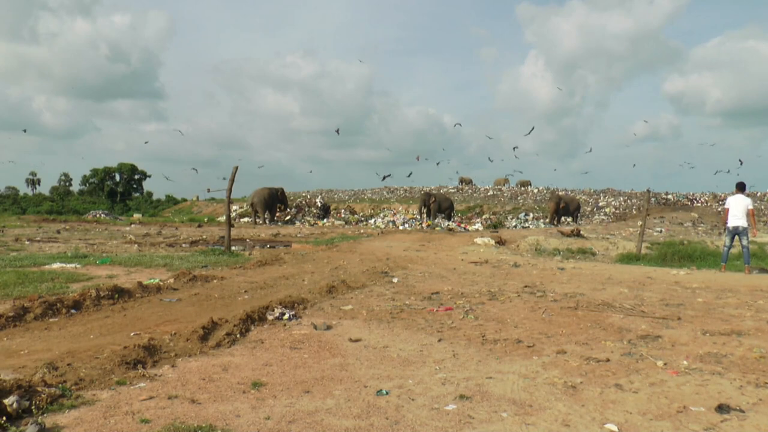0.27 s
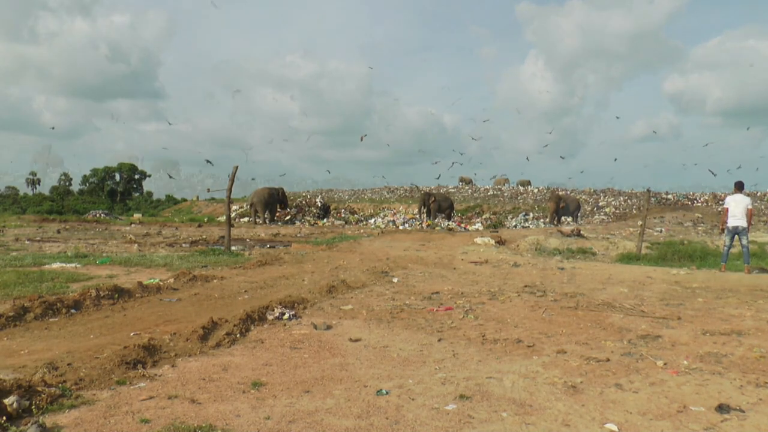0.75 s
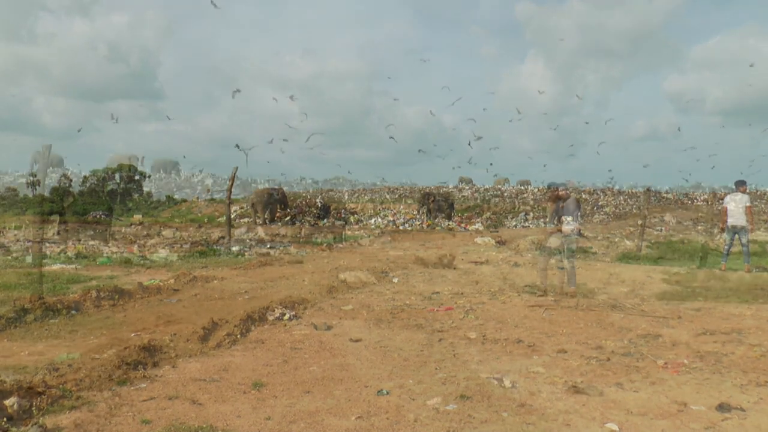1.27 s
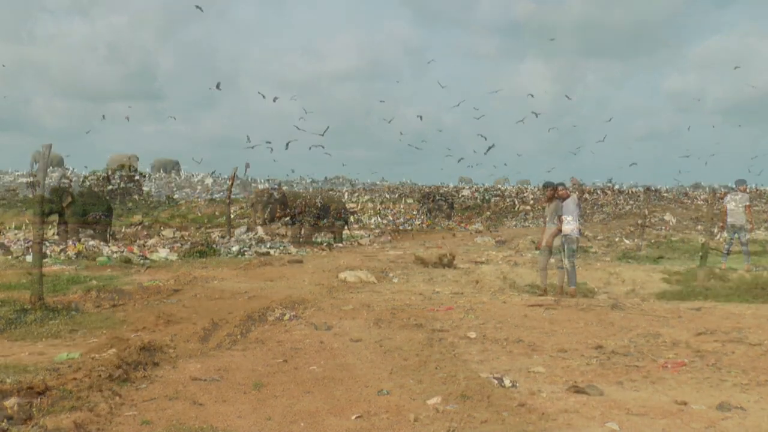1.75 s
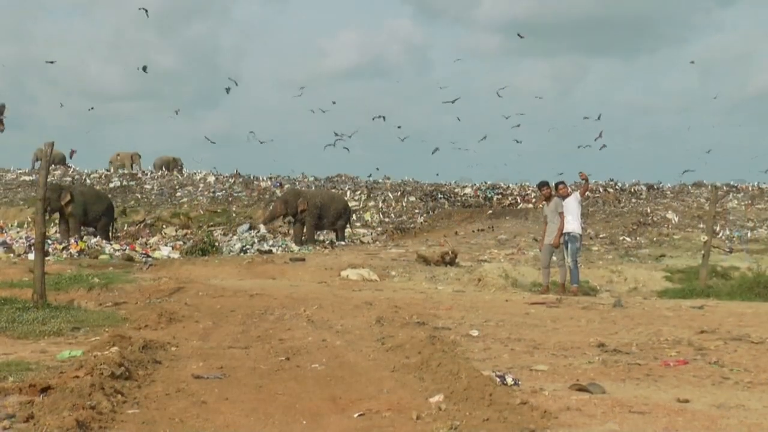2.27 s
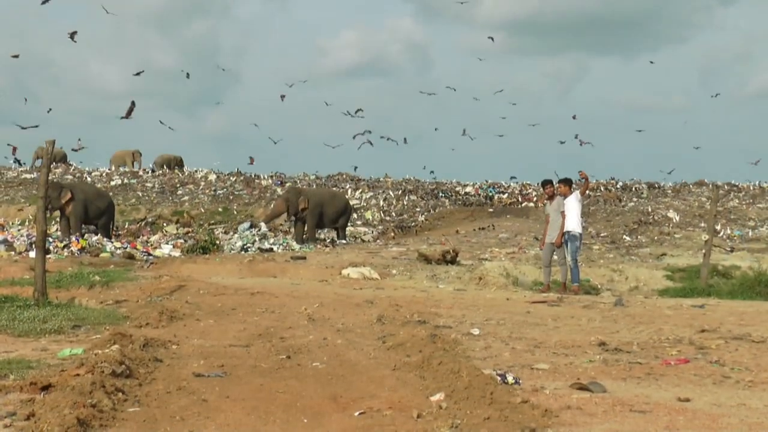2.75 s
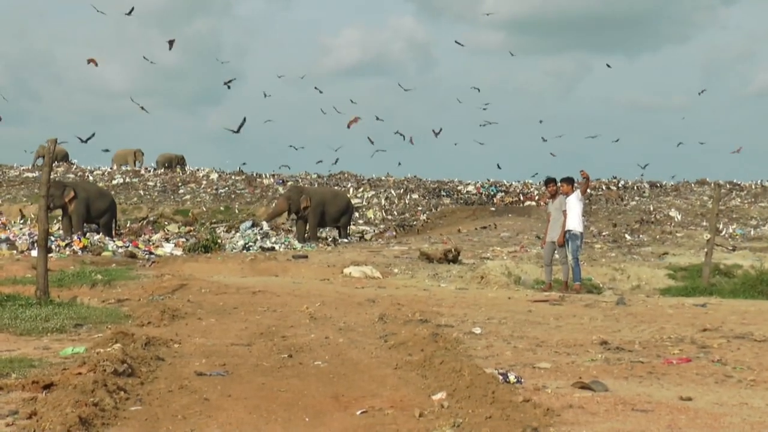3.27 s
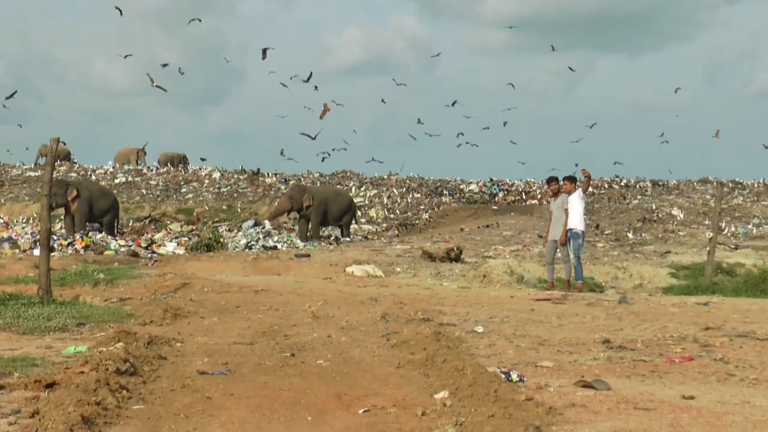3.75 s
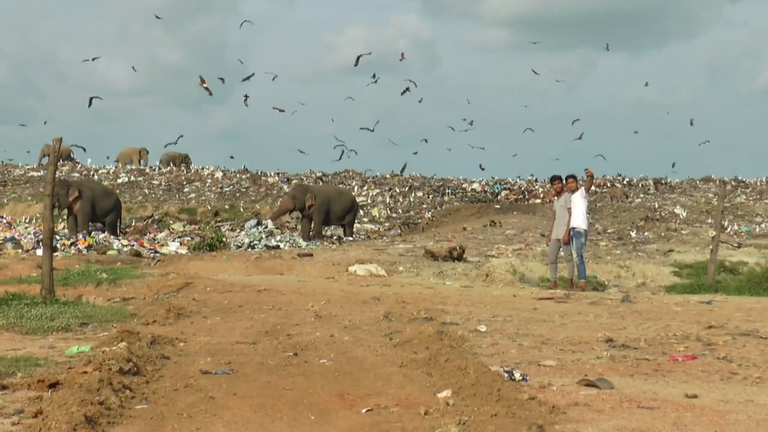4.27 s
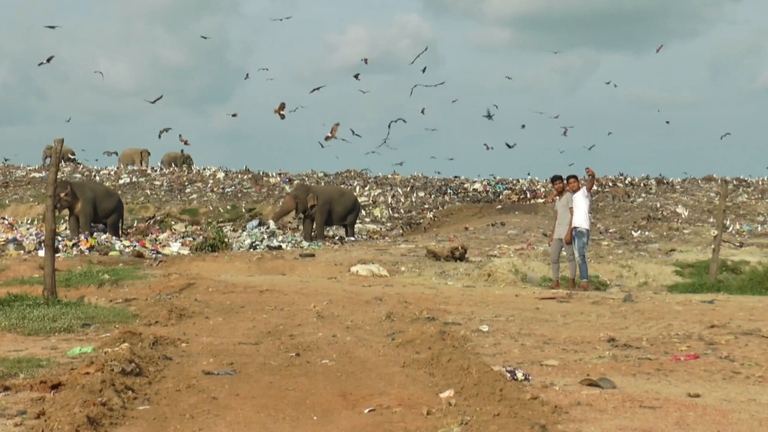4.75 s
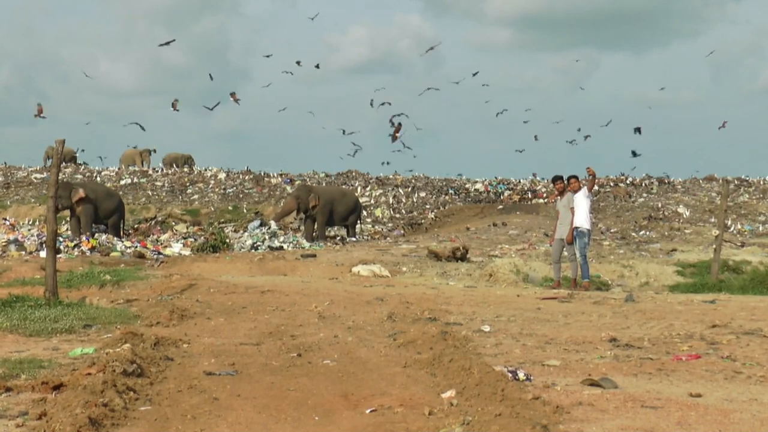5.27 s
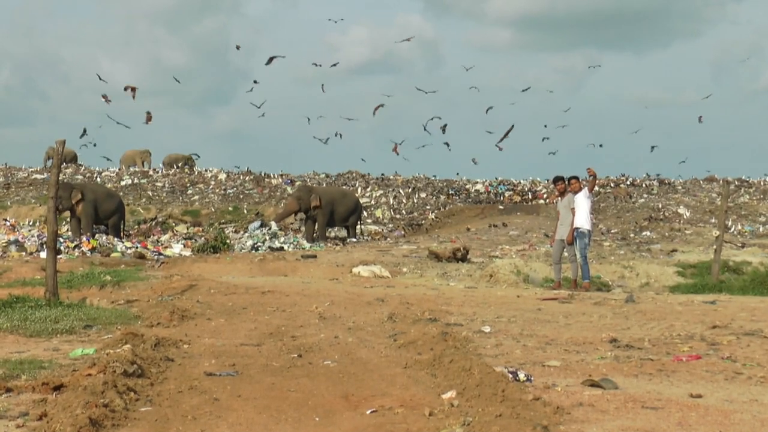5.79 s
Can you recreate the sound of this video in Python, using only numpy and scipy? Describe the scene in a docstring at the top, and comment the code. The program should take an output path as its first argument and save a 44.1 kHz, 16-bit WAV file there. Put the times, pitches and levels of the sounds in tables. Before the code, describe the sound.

Many crows caw in an overlapping din over open ground, with small birds chirping thinly and wind buffeting the microphone at first.

```python
"""Crows caw over open ground: near birds, a voice stacked of partials, rattled by the syrinx, with rasp on top.
A far flock of many such caws blurs into a din. Bending tones are high chirps of small birds and, below 2 kHz,
probably wails of crows; small birds also trill, peep and buzz thinly, and a few dry ticks are bursts of noise.
Ground and heaps echo the birds. Wind, lumpy low noise and hiss, buffets both microphone ports, most at first;
a faint low hum lies beneath. Near the end the sound drops out for a moment."""
import sys
import numpy as np
from scipy import signal
from scipy.fft import rfft, irfft, next_fast_len
from scipy.io import wavfile
from scipy.ndimage import uniform_filter1d, map_coordinates

SR = 44100
rng = np.random.default_rng(int(sys.argv[2]) if len(sys.argv) > 2 else 0)


def to_wav(s):
    """Save 16-bit WAV."""
    ch = np.atleast_2d(s).T  # columns
    pcm = np.round(np.clip(ch, -1, 1) * 32767)  # PCM
    wavfile.write(sys.argv[1], SR, pcm.astype(np.int16))


N = 265482  # samples, about 6 s


def amp(db):
    """Gain of a level in dB."""
    return 10 ** (np.asarray(db) / 20)


def unit(x):
    """x at rms 1."""
    return x / np.sqrt(np.mean(x ** 2) + 1e-20)


def along(points, hz):
    """Values at hz between (f/Hz, value) points, on a log frequency axis."""
    f, v = np.transpose(points)
    return np.interp(np.log(hz + 1), np.log(f + 1), v)


def curves(rows, fade=0.005):
    """Columns sample by sample over the span of the rows, and an edge with a start and end of fade seconds."""
    s, *cols = np.transpose(rows)
    t = np.arange(s[0], s[-1], 1 / SR)
    edge = np.clip(np.minimum(t - s[0], s[-1] - t) / fade, 0, 1)
    return [np.interp(t, s, c) for c in cols] + [edge]


def whole(rows):
    """Columns for every sample of the scene."""
    s, *cols = np.transpose(rows)
    return [np.interp(np.arange(N) / SR, s, c) for c in cols]


def wobble(rate, size):
    """A smooth random curve through rate random knots a second."""
    knots = rng.standard_normal(int(size * rate / SR) + 4)
    return map_coordinates(knots, [np.arange(size) * rate / SR])


def coloured(x, points):
    """x through a spectrum of (f/Hz, level/dB) points."""
    size = x.shape[-1]
    padded = next_fast_len(size + 2048)
    gain = amp(along(points, np.fft.rfftfreq(padded, 1 / SR)))
    return irfft(rfft(x, padded) * gain, padded)[..., :size]


def turning(hz):
    """A unit pointer that turns at hz from a random phase; its real part is a pure tone."""
    return np.exp(2j * np.pi * (np.cumsum(hz) / SR + rng.random()))


def add(stage, s, sound, pan_db, lag=3):
    """Places a sound left over right by pan_db; the right port hears it lag samples late."""
    for channel, start in enumerate((round(s * SR), round(s * SR) + lag)):
        heard = sound[max(-start, 0):]
        room = stage[channel, max(start, 0):][:len(heard)]
        room += amp(-pan_db * channel) * heard[:len(room)]


# Resonance of a crow's throat, for its upper partials and rasp: f/Hz, relative level/dB
THROAT_SPECTRUM = [(300, -50), (700, -26), (1100, -6), (1700, 0), (2300, -8), (3000, -26), (5000, -60),
                   (20000, -120)]
# Treble part of the rasp: f/Hz, relative level/dB
BEAK_SPECTRUM = [(1500, -60), (2600, -14), (3700, -14), (4000, 0), (4250, 0), (4600, -16), (5500, -10),
                 (6300, -3), (7200, -7), (8500, -13), (10000, -17), (14000, -40)]


def caw(voice, colour, rows):
    """A stack of partials, chopped by a slower second vibration of the syrinx, with rasp gated by it."""
    share, strongest, spread, rasp_db = voice
    first_db, second_db, fourth_db, treble_db = colour[:4]
    pitch, level_db, edge = curves(rows)
    size = len(pitch)
    pitch = uniform_filter1d(pitch, size=800, mode="nearest")
    tone = turning(pitch * (1 + .003 * wobble(60, size)))
    rattle = turning(share * pitch * (1 + .03 * wobble(30, size)))

    # The slow vibration puts sidebands around every partial; the fundamental is hardly chopped.
    chop = 0
    for j in range(-3, 4):
        sideband = np.exp(-((j - strongest) / spread) ** 2 / 2 + 1.2j * j * j)
        chop = chop + sideband * rattle ** j

    # The fifth and sixth partials follow the fourth through the throat.
    throat_db = along(THROAT_SPECTRUM, pitch.mean() * np.arange(4, 7))
    gains = amp([second_db, 0, *(fourth_db + throat_db - throat_db[0])])
    stack = 0
    for partial, gain in enumerate(gains, start=2):
        stack = stack + gain * amp(1.18 * wobble(38.36, size)) * tone ** partial
    fundamental = amp(first_db) * tone * (1 + 0.21 * chop)
    voiced = (stack * chop + fundamental).real

    gate = (1 + .7 * rattle.real) * (1 + .5 * tone.real)
    breath = gate * rng.standard_normal(size)
    rasp = amp(rasp_db) * unit(coloured(breath, THROAT_SPECTRUM))
    rasp += amp(treble_db) * unit(coloured(breath, BEAK_SPECTRUM))
    return np.sqrt(2) * edge * amp(level_db) * (voiced + np.std(voiced) * rasp)


# A near caw climbs to its top from this share of it, swelling; then it sags.
RISE_S, RISE_FROM, ATTACK_DB = .055, .9, -10
RELEASE_DB, RELEASE_LATE = -10, 7.3  # the breath gives out at the very end: loss, and its power of time
# Rattle as share of pitch, and strongest sideband; deep voices rattle at a larger share.
RATTLE, DEEP_RATTLE, DEEP_HZ = (.155, .15), (.22, -1.6), 500
RASP_DB, RASP_DB_PER_HOARSE = -24.5, 10  # a hoarser bird rasps more
# Near caws: top reached t/s, sag length t/s, top f/Hz, end f/Hz, lateness of the sag [power of time],
# third partial level/dB at top and at end (before the release), hoarseness [sideband spread],
# partials 1, 2 and 4 level/dB against the third, treble rasp level/dB against the voiced sound,
# pan level/dB left over right
NEAR_CAWS = [ (0, 0.18, 569.3, 476.6, 0.91, -51, -63, 0.34, -20.5, -17, -14, -22, -4),
             (.02, 0.25, 683.5, 606, 1.23, -68.5, -52.5, 1.26, -26, -16, -18, -34, -3),
             (.52, 0.051, 592, 573, 1.3, -59.5, -53, 0.66, -29, -10, -30, -21, -3),
             (.81, 0.17, 648, 612, 1.43, -53.5, -57, 0.56, -31, -9, -38, -32, 4.5),
             (1.005, .405, 596, 470, 1.35, -48.5, -52.5, 0.86, -22, -14.5, -19.5, -19, -5),
             (1, 0.23, 430.5, 399.4, 1.5, -56, -59.5, 0.55, -25, -20, 4, -33, -3.5),
             (1.765, 0.31, 633.6, 513.5, 1.48, -44.5, -55.5, 0.51, -25.5, -9, -26.5, -33, -5),
             (1.89, 0.2, 548, 500, 1.41, -57.5, -58, 1.62, -20, -11.5, -8, -25, -2),
             (2.19, 0.27, 590, 483, 1.12, -51.5, -57.5, 0.74, -30, -13.5, -37, -44, -1),
             (2.42, 0.34, 635, 566, 1.1, -59.5, -62, 1.4, -18.5, -19, -19, -29, 6),
             (2.945, 0.27, 664.6, 531, 2.18, -63.5, -60.5, 1.37, -11, -5.5, -7.5, -19, -3),
             (3.35, 0.2, 437.8, 398, 1.8, -61, -62.5, 0.71, -41, -38, 9.5, -10, -4),
             (3.63, 0.3, 668, 545.5, 1.6, -58, -51.5, 1, -22, -8.5, -18, -26, -5.5),
             (4.05, 0.18, 614, 491, 1.2, -61, -53, 0.98, -27, -19, -23, -16, 2),
             (4.175, .35, 641, 481.7, 1.28, -59.5, -61.5, 0.83, -18.5, -9.5, -17, -35, -5),
             (4.779, 0.26, 666.6, 559.3, 1.2, -47.5, -49.5, 0.67, -22.5, -13.5, -19.5, -34, -4.5),
             (5.06, 0.31, 589, 486.5, 1.4, -43, -61, 0.66, -22, -11.5, -20, -26.5, -4.5),
             (5, 0.48, 690, 566, 1.16, -62, -55, 0.82, -19.5, -13, -24, -15.5, -7),
             (5.84, 0.18, 580.5, 520, 1.6, -60, -55.5, 1.2, -40, -13, -13, -24, 0), ]


def crows():
    """Near caws: each climbs quickly to its top pitch, then sags until the breath gives out."""
    stage, u = np.zeros((2, N)), np.linspace(0, 1, num=12)
    for s, long, top, end, late, db, end_db, hoarse, *colour in NEAR_CAWS:
        sag_hz = top - (top - end) * u ** late
        sag_db = db + (end_db - db) * u + RELEASE_DB * u ** RELEASE_LATE
        rows = [
            (s - RISE_S, RISE_FROM * top, db + ATTACK_DB),
            (s - RISE_S / 2, (RISE_FROM + 3) / 4 * top, db + ATTACK_DB / 2),
            *zip(s + long * u, sag_hz, sag_db),
        ]
        vibration = DEEP_RATTLE if top < DEEP_HZ else RATTLE
        voice = (*vibration, hoarse, RASP_DB + RASP_DB_PER_HOARSE * hoarse)
        add(stage, s - RISE_S, caw(voice, colour, rows), colour[-1])
    return stage


# Short near croaks: start t/s, length t/s, f/Hz, level/dB, level/dB of the closing flick
NEAR_CROAKS = [(0.168, 0.11, 1274, -52, -49), (.46, 0.081, 1259, -54.5, -51.5),
               (0.696, 0.086, 1284, -51, -51.5), (0.852, 0.074, 1327, -54, -58),
               (1.19, 0.097, 1260, -51, -47), (1.388, 0.075, 1264, -53.5, -54.5),
               (2.627, 0.088, 1204, -63.5, -74), (3.977, 0.099, 1267, -58.5, -61),
               (4.469, 0.13, 1300, -53, -84)]


def croaks():
    """A tone chopped by a rattle near 95 Hz, ending in a quick upward flick of pitch."""
    stage = np.zeros((2, N))
    for s, long, hz, db, flick_db in NEAR_CROAKS:
        bends = [
            (0, 1.04 * hz, db - 4),
            (long - .025, hz, db),
            (long - .018, 1.15 * hz, flick_db),
            (long, 1.35 * hz, flick_db),
        ]
        pitch, level, edge = curves(bends, fade=0.0012)
        rattle = turning(95 + 6 * wobble(30, len(pitch)))
        chop = 1 + .8 / rattle + .4j * rattle + .3j / rattle ** 2
        add(stage, s, edge * amp(level) * (chop * turning(pitch)).real, pan_db=-1.0)
    return stage


# Level of the far flock: t/s, level/dB
DIN_LEVEL = [(0, -52), (.3, -56.5), (1.5, -58), (2, -51.5), (2.8, -59), (3.3, -55), (4.1, -55.5),
             (4.6, -59.5), (5.2, -49), (5.6, -58.5), (6.02, -55)]
# Colour of the flock at a distance: f/Hz, relative level/dB
FAR_SPECTRUM = [(240, -59), (400, -32), (454, -18), (555, -17.5), (664, -20), (1190, -8), (1410, -2.5),
                (1500, -2), (1680, -0.5), (2800, -20.5), (5000, -41), (6500, -26), (11000, -120)]


def flock():
    """Many far caws at random, each rising quickly and sagging; together they keep to the level of the din."""
    stage = np.zeros((2, N))
    for s, a, b, c, d, e in rng.random((80, 6)):
        top, long, db = 500 + 210 * a, .25 + .2 * b, 10 * c
        rows = [(0, .9 * top, db - 10), (.06, top, db), (.55 * long, .94 * top, db), (long, .82 * top, db - 7.0)]
        voice = (.13 + .06 * d, d - .4, .6 + .6 * b, -13)
        add(stage, 6.3 * s - .3, caw(voice, (-4, -1.5, -1.5, -13), rows), pan_db=5 * (e - .8))
    # Noise of the same colour, alike at both ports, blurs the single voices.
    blur = unit(coloured(rng.standard_normal(N), FAR_SPECTRUM))
    stage = unit(coloured(stage, FAR_SPECTRUM)) + .33 * blur
    loud = np.sqrt(np.abs(uniform_filter1d(np.mean(stage ** 2, 0), size=SR // 6)))
    return amp(whole(DIN_LEVEL)[0]) * stage / loud


# Bending tones, high ones from small birds; below 2 kHz, probably crows' wails and the falling end of a caw:
# start t/s, length t/s, f/Hz at start, middle and end, level/dB at start and end
TONE_BENDS = [ (.08, 0.084, 3700, 3580, 3600, -71, -66), (.28, .07, 3450, 3350, 3350, -69, -69),
              (.35, 0.043, 3320, 3650, 4600, -64, -62), (.39, 0.076, 4340, 3720, 2640, -62, -66),
              (.645, 0.021, 3580, 3135, 2670, -61, -74), (.84, .05, 3400, 4300, 3700, -77, -71),
              (.9, 0.043, 3700, 3970, 4300, -62, -75), (.962, 0.024, 2810, 3900, 4130, -61, -62),
              (.984, .036, 4160, 4080, 3870, -60, -65), (1.2, 0.038, 3620, 3520, 3360, -56, -65),
              (1.25, 0.01, 3450, 2970, 2600, -63, -59), (1.28, 0.048, 2520, 2420, 2340, -65, -58),
              (1.39, .02, 2900, 2674, 2435, -68, -54), (1.45, .018, 2492, 2945, 2500, -61, -63),
              (1.5, 0.13, 1206, 1380, 1180, -63, -58), (1.55, 0.11, 1015, 915, 844, -75, -69),
              (1.65, 0.037, 850, 610, 378, -79, -58.5), (1.765, 0.047, 5320, 3870, 2940, -60, -66),
              (1.81, 0.022, 2950, 2920, 3020, -68, -61), (1.83, 0.031, 3040, 3800, 2900, -59, -65),
              (1.9, 0.1, 3200, 3410, 3700, -66, -63), (2.4, 0.047, 3600, 4130, 4660, -72, -69),
              (2.45, 0.073, 2485, 4090, 2930, -60.5, -57), (2.885, 0.031, 2300, 2420, 2530, -62, -55),
              (3.077, .016, 5200, 5150, 5300, -60, -61), (3.104, .02, 5530, 4550, 4170, -48, -71),
              (3.19, 0.053, 4220, 3700, 3240, -65, -70), (3.52, 0.049, 950, 828, 673, -66, -65),
              (3.53, 0.044, 1915, 1800, 1530, -62, -60), (3.62, .16, 1193, 1314, 1293, -53.5, -56),
              (3.78, .11, 1246, 1225, 1180, -54.5, -58), (3.66, 0.022, 3100, 3280, 3500, -65, -64),
              (3.72, .045, 3490, 3160, 2260, -59, -66), (3.8, .04, 2988, 3234, 3480, -65, -63),
              (3.87, .03, 3120, 3300, 3500, -68, -67), (3.972, 0.018, 4300, 4750, 4700, -64, -61),
              (3.992, 0.033, 4300, 4230, 3800, -61, -57), (4.024, 0.021, 3480, 3795, 3440, -56, -56),
              (4.046, 0.032, 3370, 2950, 2600, -57, -64), (4.05, .29, 7030, 7170, 7500, -83, -56),
              (4.19, 0.09, 3750, 3700, 3670, -68, -69), (4.33, 0.096, 3200, 3040, 3040, -73, -72),
              (4.455, 0.042, 3700, 3730, 3820, -63, -64), (4.518, 0.038, 2430, 3600, 4050, -58, -54),
              (4.552, 0.032, 4000, 3720, 3450, -59, -62), (4.585, .014, 2600, 2700, 2750, -58, -60),
              (4.53, 0.14, 1238, 1325, 1370, -59.5, -59), (4.624, 0.19, 1386, 1280, 1133, -56.5, -53.5),
              (5.06, .06, 3080, 3100, 2990, -57, -62), (5.675, .025, 8400, 8500, 8550, -58, -76),
              (5.79, .07, 2910, 3810, 3030, -73, -72), ]


def bending_tones():
    """Single tones of flickering level, each with one smooth bend of pitch."""
    stage = np.zeros((2, N))
    for s, long, first, middle, last, first_db, last_db in TONE_BENDS:
        u, db, edge = curves([(0, 0, first_db), (long, 1, last_db)], fade=.004)
        hz = first + (last - first) * u + (2 * middle - first - last) * 2 * u * (1 - u)
        level = np.sqrt(2) * edge * amp(db + 3.0 * wobble(65.4, len(hz)))
        add(stage, s, level * turning(hz).real, pan_db=4.5)
    return stage


# One trill: from t/s, to t/s, centre f/Hz, swing f/Hz, rate f/Hz [swings a second]
TRILL_SWING = (1.285, 1.425, 3620, 480, 31)
# Level peeps: start t/s, level/dB, f/Hz
PEEP_CALLS = [(4.084, -58.5, 2870), (4.273, -58, 2840), (4.443, -58.5, 2870), (4.611, -58, 2810),
              (4.808, -56.5, 2817), (4.985, -52.5, 2770), (5.196, -55, 2684), (5.41, -63, 2690),
              (5.611, -71.5, 2680)]


def songbirds():
    """One small bird trills, a tone swinging in pitch; another repeats a level peep that drops at its end."""
    stage = np.zeros((2, N))
    start, end, centre_hz, swing_hz, rate = TRILL_SWING
    t, edge = curves([(start, 0), (end, end - start)], fade=.02)
    sway = np.cos(2 * np.pi * rate * (t - .017))
    level = edge * amp(-57.5 - 3 * sway)  # softer at the high turns
    add(stage, start, level * turning(centre_hz + swing_hz * sway).real, pan_db=3)

    for s, db, hz in PEEP_CALLS:
        bend, edge = curves([(0, 1.005), (.064, .995), (.074, .93)])
        add(stage, s, edge * amp(db) * turning(hz * bend).real, pan_db=5.5, lag=1)
    return stage


# Thin high buzzes: from t/s, to t/s, centre f/Hz, level/dB
HIGH_BUZZES = [(0.89, 1.02, 7200, -73), (1.039, 1.173, 5930, -63), (1.305, 1.431, 7460, -66),
               (4.454, 4.59, 6950, -71)]


def chatter():
    """Small birds further off: faint short chirps of bending tone, and a few thin buzzes of narrow noise."""
    stage = np.zeros((2, N))
    for s, a, b, c, d in rng.random((240, 5)):
        top, long = 2700 + 1300 * a, .015 + .05 * b
        bend = [(0, top * (1.1 - .2 * c)), (.4 * long, top), (long, top * (1.04 - .2 * d))]
        hz, edge = curves(bend, fade=.006)
        level = edge * amp(-76 + 7 * b * d + 3 * wobble(80, len(hz)))
        add(stage, 6 * s, level * turning(hz).real, pan_db=10 * (c - .4), lag=round(6 * a))
    for start, end, hz, db in HIGH_BUZZES:
        level, edge = curves([(start, db), (end, db)])
        band = [(.85 * hz, -30), (.96 * hz, 0), (1.04 * hz, 0), (1.15 * hz, -30)]
        buzz = unit(coloured(rng.standard_normal(len(edge)), band))
        add(stage, start, edge * amp(level) * buzz, pan_db=-4.0)
    return stage


# Dry ticks: t/s, level/dB at the onset
CLICK_TIMES = [(5.377, -43), (5.452, -64), (5.596, -46.5), (5.607, -54)]
# Colour of a tick: f/Hz, relative level/dB
TICK_SPECTRUM = [(300, -18), (1500, 14), (4000, -5), (8000, -18), (14000, -34)]


def clicks():
    """A few faint dry ticks: coloured noise falling at a rate of 60 dB in 20 ms, cut off at 600 samples."""
    stage, t = np.zeros((2, N)), np.arange(600) / SR
    for s, db in CLICK_TIMES:
        tick = unit(coloured(rng.standard_normal(len(t)), TICK_SPECTRUM))
        add(stage, s, amp(db - 60 * t / .02) * tick, pan_db=-1.5)
    return stage


def field(x):
    """Scattered echoes from the ground and heaps, noise dying by 60 dB in 73 ms, different at each port."""
    t = np.arange(SR // 4) / SR
    tail = rng.standard_normal((2, len(t))) * amp(-60 * t / 0.073)
    return signal.fftconvolve(x, tail / np.linalg.norm(tail[0]), axes=1)[:, :N]


WIND_PAN_DB, PAN_SWING_DB = 3.5, 2.5  # buffeting left over right; its random swing
# Buffeting at the microphone ports: t/s, level/dB
BUFFET_LEVEL = [(0.0, -53.5), (0.05, -50), (0.08, -55.5), (0.23, -54.5), (0.28, -67), (0.35, -56.5),
                (0.48, -57.5), (0.72, -65.5), (0.95, -55), (0.99, -60), (1.04, -52.5), (1.07, -64),
                (1.16, -55), (1.52, -68), (1.56, -80), (1.73, -67), (1.76, -74.5), (2.87, -79.5),
                (2.98, -77), (4.26, -86), (4.44, -73), (4.49, -58.5), (4.56, -72), (5.1, -87),
                (5.15, -69.5), (5.35, -78), (5.38, -69.5), (5.56, -90), (5.68, -68.5), (5.7, -84),
                (5.75, -67.5), (5.8, -78), (5.99, -71), (6.02, -82)]
# Colour of the buffeting: f/Hz, relative level/dB per Hz
BUFFET_SPECTRUM = [(24, -52), (40, -15.5), (87, 3.5), (151, 1), (301, -6.5), (455, -18), (578, -22.5),
                   (715, -24), (800, -21.5), (1040, -21), (1760, -120)]
# Level of the smooth hiss: t/s, level/dB
HISS_LEVEL = [(0, -61), (.7, -64), (1.2, -58), (1.5, -62.5), (2.77, -63), (3.69, -60.5), (4.14, -61.5),
              (5.11, -61.5), (5.7, -67), (6.02, -63.5)]
# Colour of the hiss: f/Hz, relative level/dB per Hz
HISS_SPECTRUM = [(15, -52), (25, -7), (59, -11), (291, -14.5), (784, -13.5), (1220, -22), (1590, -22),
                 (1910, -2.5), (2670, -15.5), (3470, -12.5), (4280, -19.5), (10100, -25), (12800, -32),
                 (16700, -71), (22000, -120)]


def wind():
    """Lumpy buffeting and a smooth hiss, both noise unrelated between the ports."""
    lumps = amp(3.4 * np.array([wobble(25, N), wobble(25, N)]))
    buffet = unit(coloured(lumps * rng.standard_normal((2, N)), BUFFET_SPECTRUM))
    hiss = unit(coloured(rng.standard_normal((2, N)), HISS_SPECTRUM))
    pan_db = WIND_PAN_DB + PAN_SWING_DB * wobble(10, N)
    side_db = np.array([pan_db, -pan_db]) / 2
    buffeting = np.sqrt(2) * amp(whole(BUFFET_LEVEL)[0] + side_db) * buffet
    return buffeting + amp(whole(HISS_LEVEL)[0]) * hiss


def low_hum():
    """A faint tone that wavers slowly around 50 Hz, alike at both ports."""
    return amp(-83) * turning(50 + wobble(4.4, N)).real


CAW_ECHO_DB, TONE_ECHO_DB = -15, -11  # the small birds sit low among the heaps


def scene():
    """Birds with their echoes, over ticks, wind and a faint low hum."""
    caws = crows() + croaks() + flock()
    tones = bending_tones() + songbirds() + chatter()
    echoes = field(amp(CAW_ECHO_DB) * caws + amp(TONE_ECHO_DB) * tones)
    return caws + tones + echoes + clicks() + wind() + low_hum()


DROP_FROM_S, DROP_TO_S, DROP_DB_PER_S = 5.6945, 5.7335, 9000
TOP_HZ = 13050  # band limit


def record(dry):
    """The sound drops out briefly and returns at once; nothing above the band limit is kept."""
    t = np.arange(N) / SR
    falling = amp(-np.clip(t - DROP_FROM_S, 0, 1) * DROP_DB_PER_S)
    gain = np.where(t > DROP_TO_S, 1, falling)
    return coloured(dry * gain, [(1, 0), (TOP_HZ, 0), (TOP_HZ + 20, -120), (SR, -120)])


dry = scene()
out = record(dry)
to_wav(out)
```